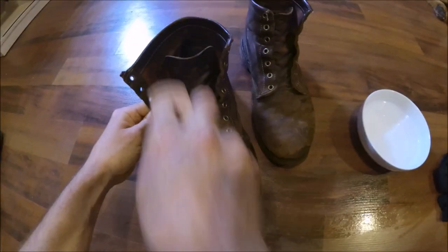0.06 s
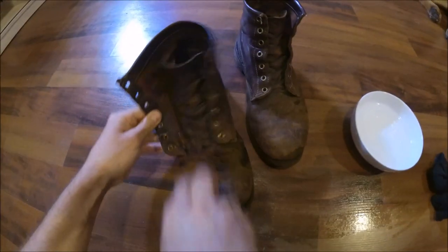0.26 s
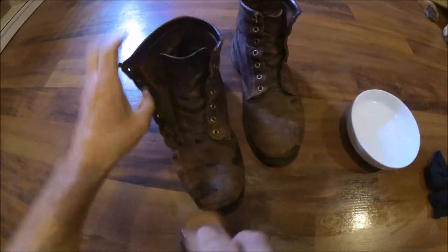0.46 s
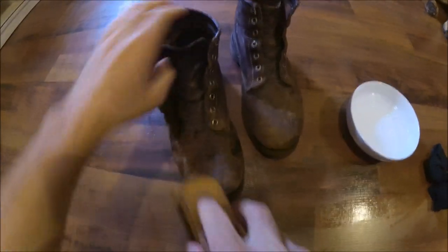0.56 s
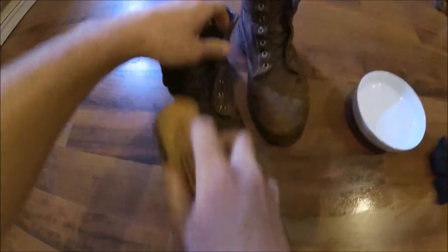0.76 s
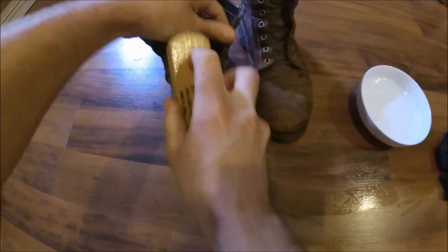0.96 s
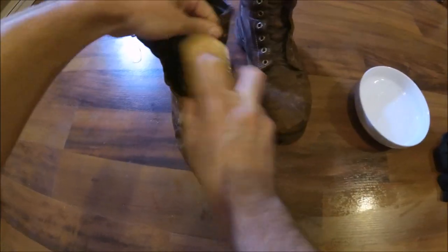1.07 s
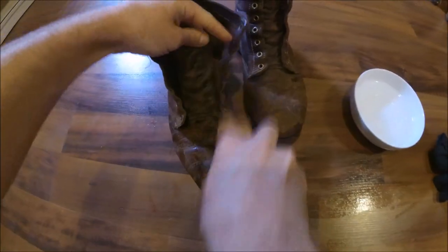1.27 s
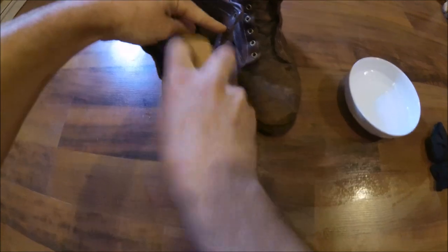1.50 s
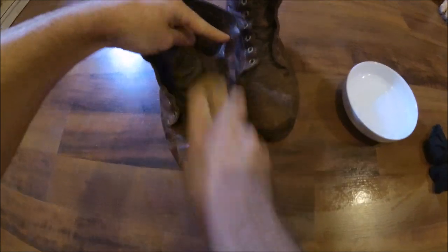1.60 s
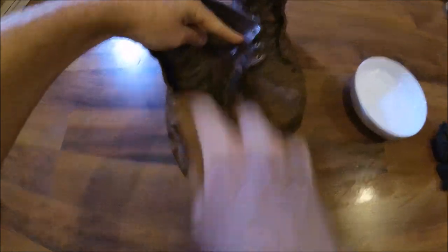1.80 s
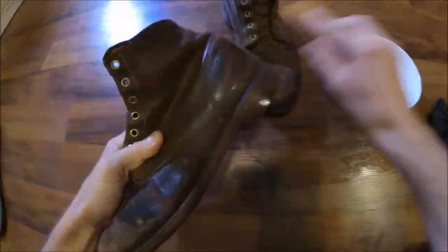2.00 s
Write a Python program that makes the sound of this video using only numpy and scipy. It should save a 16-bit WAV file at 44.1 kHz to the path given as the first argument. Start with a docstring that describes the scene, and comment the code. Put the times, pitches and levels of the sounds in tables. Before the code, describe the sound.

A stiff brush scrubs a leather boot in about five uneven strokes, hissing and rasping with a hollow rub. It bumps the boot lightly in an early hard stroke and again later. Heard close in a small, quiet room.

```python
"""A stiff brush scrubs a leather boot held over a wooden floor in a small room.
In each of five strokes the bristles catch and flick across the leather. Their many small impulses
merge into a hiss, a rasp and the hollow rub of the boot's shell. Tufts slap down and scratch over creases,
the leather judders by stick-slip, and the shell knocks where the brush bumps it.
Faint room noise lies between the strokes."""
import sys
import numpy as np
from scipy import signal
from scipy.fft import rfft, irfft, next_fast_len
from scipy.io import wavfile

SR = 44100
rng = np.random.default_rng(int(sys.argv[2]) if len(sys.argv) > 2 else 0)


def pcm_store(signal):
    """Save signal as 16-bit PCM."""
    levels = np.round(np.clip(np.atleast_2d(signal), -1, 1) * 32767)
    wavfile.write(sys.argv[1], SR, levels.astype(np.int16).T)


N = 90404
TIME = np.arange(N) / SR
RUB_WIDTH, RASP_WIDTH, HISS_WIDTH = 0.099, 0.31, 0.83   # side over mid
RUB_PAN_DB, RASP_PAN_DB, HISS_PAN_DB = 2, 2, 3.5


def from_db(db):
    """Amplitude grows tenfold every 20 dB."""
    return 10 ** (np.asarray(db) / 20)


def rms_one(x):
    """Normalisation to unit RMS level."""
    return x / np.sqrt(np.mean(x ** 2) + 1e-20)


def click(s):
    """A unit impulse at s seconds."""
    return 1.0 * (np.arange(N) == int(s * SR))


def swell(s, length):
    """A Gaussian envelope peaking at s seconds."""
    return np.exp(-.5 * ((TIME - s) / length) ** 2)


def drift(hz):
    """Low-passed noise: a random fluctuation of unit RMS."""
    r = np.exp(-2 * np.pi * hz / SR)
    return rms_one(signal.lfilter([1], [1, -2 * r, r * r], rng.standard_normal(2 * N))[N:])


def spread(pair, width):
    """Mid-side stereo: the sum goes left, the difference right."""
    return pair[0] + width * pair[1] * np.array([[1], [-1]])


def pan(db):
    """Level panning: channel gains with the left louder by db."""
    return from_db(np.array([[db], [-db]]) / 2)


def colour(x, spectrum):
    """Minimum-phase filtering through (Hz, relative dB) points, to unit RMS."""
    size = 2 * next_fast_len(N)
    hz, db = np.transpose(spectrum)
    grid = np.maximum(np.arange(size // 2 + 1) * SR / size, 1)
    bass_rolloff = np.minimum(grid / hz[0], 1)
    magnitude = bass_rolloff * from_db(np.interp(np.log(grid), np.log(hz), db))
    cepstrum = irfft(np.log(magnitude))
    cepstrum[1:size // 2] *= 2   # folding the cepstrum makes the filter causal
    cepstrum[size // 2 + 1:] = 0
    return rms_one(irfft(rfft(x, size) * np.exp(rfft(cepstrum)))[..., :N])


def ring(x, hz, t60):
    """A damped oscillator: a unit impulse starts a sine that falls 60 dB in t60 seconds."""
    r, w = np.exp(-np.log(1000) / (t60 * SR)), 2 * np.pi * hz / SR
    return signal.lfilter([0, np.sin(w)], [1, -2 * r * np.cos(w), r * r], x + 1e-18)


def resonate(x, hz, q):
    """A resonator passes one band of x; unit RMS."""
    return rms_one(signal.lfilter(*signal.iirpeak(hz, q, fs=SR), x + 1e-18))


def emphasise(x, hz, q, db):
    """A resonance lifts one band of x above the rest; unit RMS."""
    band = signal.lfilter(*signal.iirpeak(hz, q, fs=SR), x)
    return rms_one(x + (from_db(db) - 1) * band)


def low_cut(x, hz):
    """A small radiator, such as a patch of leather, gives out little bass."""
    return signal.sosfilt(signal.butter(3, hz, "high", fs=SR, output="sos"), x)


def ambience():
    """Steady room noise, less correlated between channels in the treble, and white microphone hiss."""
    # Mid and side spectra of the room noise. Each row: frequency in Hz, relative density in dB.
    mid_spectrum = [(30, -32.5), (70, -15.5), (130, -14), (200, -2), (290, -7.5), (480, -0.5), (760, -3),
                    (1300, -5.5), (2200, -11.5), (4000, -17), (8000, -24.5), (12000, -20), (15000, -14)]
    side_spectrum = [(30, -10.5), (150, -19), (400, -4), (1200, -5), (4000, -5.5), (15000, -5)]
    mid = from_db(-60) * colour(rng.standard_normal(N), mid_spectrum)
    side = from_db(-64.5) * colour(rng.standard_normal(N), side_spectrum)
    hiss = from_db(-64.5) * rng.standard_normal((2, N))
    return pan(db=1.5) * (spread([mid, side], width=0.95) + hiss)


def room(x):
    """Convolution with early reflections and a diffuse tail dulled by wall absorption."""
    # Reflections from the floor and nearby things. Each row: delay in seconds, level in dB.
    echoes = [(.0029, -32), (.0047, -25), (.0083, -16.5)]
    t60_s, tail_db, wall_cut_hz = 0.46, -18, 3700
    decay = from_db(-60 * TIME / t60_s) * (TIME > .006)
    tail = spread(rng.standard_normal((2, N)), width=0.2) * decay
    tail = signal.sosfilt(signal.butter(1, wall_cut_hz, fs=SR, output="sos"), tail)
    tail *= from_db(tail_db) / np.sqrt(np.sum(tail ** 2) / 2)
    early = sum(from_db(db) * click(s) for s, db in echoes)
    return signal.fftconvolve(x, tail + early, axes=1)[:, :N]


def microphones(x, lag_s=.000012):
    """Arrival-time difference: the sound reaches the left microphone first."""
    size = next_fast_len(N)
    delay = np.exp(-2j * np.pi * np.fft.rfftfreq(size, 1 / SR) * lag_s)
    return np.array([x[0], irfft(rfft(x[1], size) * delay, size)[:N]])


def shell(x):
    """Modal vibration: the boot's hollow shell answers x as a sum of damped oscillators."""
    # Each row: mode frequency in Hz, level in dB, time to fall 60 dB in seconds.
    modes = [(369, -4, 0.19), (479.8, -3, 0.16), (557.3, -5, 0.16), (688, -3.5, 0.11), (760.3, 2.5, 0.11),
             (808, -4, 0.12), (1147, -6, 0.13), (1235.3, -2.5, 0.15), (1365, -5.5, 0.064), (1833, -3, .1),
             (1940, -9, 0.12)]
    ringing = sum((-1) ** k * from_db(db) * ring(x, hz, t60) for k, (hz, db, t60) in enumerate(modes))
    return low_cut(ringing, hz=140)


def judders():
    """Stick-slip: the leather shudders under the bristles in brief tones of uneven pitch and level."""
    # Each row: peak time in seconds, level in dB, pitch in Hz, swell time in seconds.
    slips = [(1.297, -41.5, 530, 0.0046), (1.303, -40.5, 784.7, 0.01), (1.343, -53.5, 763, 0.0054),
             (1.673, -47.5, 350, 0.019), (1.683, -43, 545, 0.0063), (1.682, -45, 690, 0.0031),
             (1.776, -49.5, 202.8, 0.0057)]
    drift_hz, pitch_spread, rough_db = 204.5, .09, 3.5
    out = 0
    for s, db, hz, length in slips:
        pitch = hz * (1 + pitch_spread * drift(drift_hz))
        tone = rms_one(np.sin(2 * np.pi * np.cumsum(pitch) / SR))
        out = out + from_db(db + rough_db * drift(drift_hz)) * swell(s, length) * tone
    return low_cut(pan(RUB_PAN_DB) * out, hz=119)


def knocks():
    """Impulse excitation: each bump dents the leather for a few cycles and leaves the shell ringing."""
    # Each row: time in seconds, level in dB, pitch of the dent in Hz.
    bumps = [(0.208, -36, 234), (0.229, -28, 373), (0.274, -20, 393), (0.2797, -24.5, 353),
             (0.283, -16.5, 490), (0.738, -43.5, 343), (1.518, -48, 280), (1.548, -24.5, 484),
             (1.586, -36.5, 362)]
    dent_cycles, shell_db = 6.25, -24.5
    dents = sum(from_db(db) * low_cut(ring(click(s), hz, dent_cycles / hz), 0.78 * hz)
                for s, db, hz in bumps)
    blows = sum(from_db(db) * click(s) for s, db, _ in bumps)
    return pan(RUB_PAN_DB) * (dents + from_db(shell_db) * shell(blows))


def slaps():
    """Superposed impacts: a tuft's bristles land within milliseconds and make one burst of noise."""
    # Each row: landing time in seconds, level in dB, hold time in seconds, resonance in Hz.
    landings = [(0.146, -52.5, 0.0022, 2000), (0.193, -42, 0.0054, 3600), (0.2038, -34.5, 0.0035, 1890),
                (0.228, -45, 0.0021, 3000), (0.2286, -27.5, 0.00097, 1700), (0.2377, -32.5, 0.0025, 1890),
                (0.25, -33, 0.0013, 1500), (1.081, -47, .004, 4460), (1.521, -51, 0.0033, 2400),
                (1.5396, -42.5, 0.002, 7100), (1.5408, -37.5, .001, 3600), (1.5439, -35.5, 0.0029, 2670),
                (1.549, -35.5, 0.0015, 2560), (1.576, -39.5, 0.0095, 2570), (1.728, -39.5, 0.003, 2950),
                (1.768, -42.5, 0.0082, 3270)]
    # Each row: frequency in Hz, relative density in dB.
    spectrum = [(40, -54.5), (150, -8), (500, 3), (1200, -1), (2000, -5.5), (2800, -5.5), (4500, -6),
                (8500, -7), (11000, -21), (16000, -32.5)]
    attack_s, release_s = 0.0005, 0.0028
    noise = colour(spread(rng.standard_normal((2, N)), RASP_WIDTH), spectrum)
    out = 0
    for s, db, hold, hz in landings:
        rise = np.clip((TIME - s) / attack_s + 1, 0, 1)
        fall = np.exp(-np.maximum(TIME - s - hold, 0) / release_s)
        out = out + from_db(db) * rise * fall * emphasise(noise, hz, q=5.9, db=14.5)
    return pan(RASP_PAN_DB) * out


def flicks(width, per_s=9000, spread_db=1.5):
    """Shot noise: bristles spring free at random, most faintly and a few hard."""
    sizes = from_db(spread_db * np.minimum(rng.exponential(1, (2, N)), 5))
    signs = rng.choice([-1, 1], (2, N))
    released = rng.random((2, N)) < per_s / SR
    return rms_one(spread(sizes * signs * released, width))


def whisks():
    """High-frequency shot noise: the bristle tips sizzle where the brush moves fastest."""
    # Each row: peak time in seconds, level in dB, swell time in seconds.
    peaks = [(.293, -52, .02), (1.30, -43, 0.016), (1.713, -37, 0.025), (1.78, -43, 0.017)]
    # Each row: frequency in Hz, relative density in dB.
    spectrum = [(6000, -29.5), (10000, -12.5), (12000, 0), (15000, -2.5)]
    envelope = sum(from_db(db) * swell(s, length) for s, db, length in peaks)
    return pan(HISS_PAN_DB) * envelope * colour(flicks(HISS_WIDTH), spectrum)


def snaps(per_s=140):
    """Sparse impulses excite a resonance as single stiff bristles snap over the grain."""
    ticks = rng.uniform(-1.3, 1, (2, N)) * (rng.random((2, N)) < per_s / SR)
    return from_db(-15) * resonate(spread(ticks, RASP_WIDTH), hz=3000, q=3.6)


def stroke_gains(stroke):
    """Envelopes of rub, rasp and hiss through one stroke, with exponential onset and decay."""
    attack_db_per_s, release_db_per_s = 1795, 140
    s, *levels = np.transpose(stroke)
    onset_db = attack_db_per_s * np.maximum(s[0] - TIME, 0)
    decay_db = release_db_per_s * np.maximum(TIME - s[-1], 0)
    return from_db([np.interp(TIME, s, db) - onset_db - decay_db for db in levels])


def scrubbing():
    """Friction noise: flicking bristles hiss, rasp on the leather and force the shell to vibrate."""
    # The course of each stroke. Each row: time in seconds, then levels of rub, rasp and hiss in dB.
    fading = [(0.0, -47, -53.5, -44), (0.044, -59, -56, -55), (0.134, -54.5, -53.5, -58.5),
              (0.19, -62, -56, -53.5)]
    hard = [(.203, -56, -45, -42.5), (0.222, -47, -41.5, -45), (0.232, -35, -32.5, -40.5),
            (.252, -30.5, -36, -39), (.268, -37.5, -35, -39), (.284, -32.5, -36.5, -35),
            (.316, -54, -44.5, -39), (0.366, -52.5, -52.5, -50), (.383, -44.5, -44.5, -55.5),
            (.44, -57, -55, -60), (.51, -72, -63.5, -63)]
    faint = [(.735, -79, -63, -68), (.79, -58.5, -62, -67.5), (.86, -67, -67, -75.5)]
    light = [(.97, -76, -67, -71), (1.039, -57, -57.5, -69), (1.072, -66, -57.5, -50),
             (1.083, -53.5, -47.5, -56.5), (1.125, -51, -47, -47.5), (1.225, -56, -51, -52.5),
             (1.249, -55, -44.5, -45.5), (1.279, -44, -42, -44.5), (1.303, -45.5, -40.5, -35.5),
             (1.327, -70, -50.5, -45.5), (1.368, -65, -57.5, -43), (1.395, -71, -59, -57),
             (1.50, -67, -60, -74)]
    long = [(1.54, -74, -54, -47.5), (1.57, -55, -46.5, -46.5), (1.60, -44.5, -43, -44),
            (1.642, -42, -41.5, -45.5), (1.684, -39, -40.5, -34.5), (1.702, -50, -43, -41),
            (1.745, -42.5, -42, -46.5), (1.795, -44.5, -45.5, -42.5), (1.815, -59, -47, -53.5),
            (1.86, -56.5, -55, -58), (1.909, -86, -72, -70)]
    # Bristles ring differently on each part of the boot.
    # Each row: stroke, resonance of the rasp in Hz, resonance of the hiss in Hz.
    strokes = [(fading, 3800, 16000), (hard, 1100, 14000), (faint, 1600, 14000),
               (light, 1200, 8000), (long, 1650, 14000)]
    # Spectra of the three layers. Each row: frequency in Hz, relative density in dB.
    rub_spectrum = [(25, -50.5), (60, -34.5), (115, -30), (180, -15), (290, -6.5), (370, -3.5), (520, 1),
                    (800, -0.5), (1100, -4.5), (2000, -24.5)]
    rasp_spectrum = [(400, -50), (800, -10.5), (1200, -4.5), (1550, -4), (1900, -1.5), (2150, -3),
                     (2600, -1.5), (4000, -3), (5500, -6), (7500, -15), (12000, -42.5)]
    hiss_spectrum = [(2500, -29), (4800, -5), (6500, -1.5), (8200, 0), (10500, 0.5), (13000, -1),
                     (14800, 1), (16000, -4.5)]
    rub_db, rasp_db, hiss_db, shell_db = -3.5, -1.5, -.5, -7.5
    chatter = from_db(drift(hz=73))   # tufts catch and let go, moving the level by about 1 dB
    rasp_noise = colour(flicks(RASP_WIDTH), rasp_spectrum) + snaps()
    hiss_noise = colour(flicks(HISS_WIDTH), hiss_spectrum)
    drag, bristles = 0, 0
    for stroke, rasp_hz, hiss_hz in strokes:
        rub_gain, rasp_gain, hiss_gain = stroke_gains(stroke) * chatter
        drag = drag + rub_gain
        rasp = from_db(rasp_db) * rasp_gain * emphasise(rasp_noise, rasp_hz, q=1, db=3)
        hiss = from_db(hiss_db) * hiss_gain * emphasise(hiss_noise, hiss_hz, q=6.6, db=1)
        bristles = bristles + pan(RASP_PAN_DB) * rasp + pan(HISS_PAN_DB) * hiss
    drive = flicks(RUB_WIDTH)
    rub = from_db(rub_db) * drag * colour(flicks(RUB_WIDTH), rub_spectrum)
    ringing = from_db(shell_db) * shell(drag * drive) / np.std(shell(drive))
    return bristles + pan(RUB_PAN_DB) * (rub + ringing)


def scene():
    """Superposition of the direct sound of brush and boot, its reflections and the room noise."""
    brush = scrubbing() + whisks() + slaps() + knocks() + judders()
    return microphones(brush + room(brush)) + ambience()


def record(dry):
    """Gating and band limiting: all sound stops short, and a steep low-pass cuts the top treble."""
    end_s, fade_s, cutoff_hz = 1.909, .003, 15380
    gate = np.clip((end_s - TIME) / fade_s + 1, 0, 1)
    return signal.sosfilt(signal.ellip(12, .1, 80, cutoff_hz, fs=SR, output="sos"), dry * gate)


dry = scene()
out = record(dry)
pcm_store(out)
```